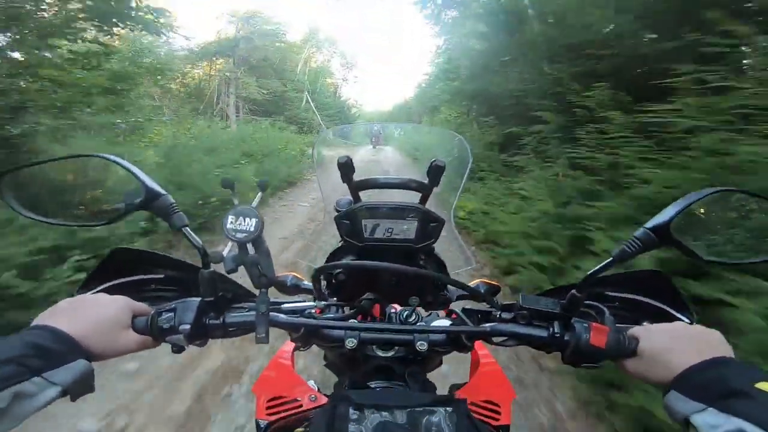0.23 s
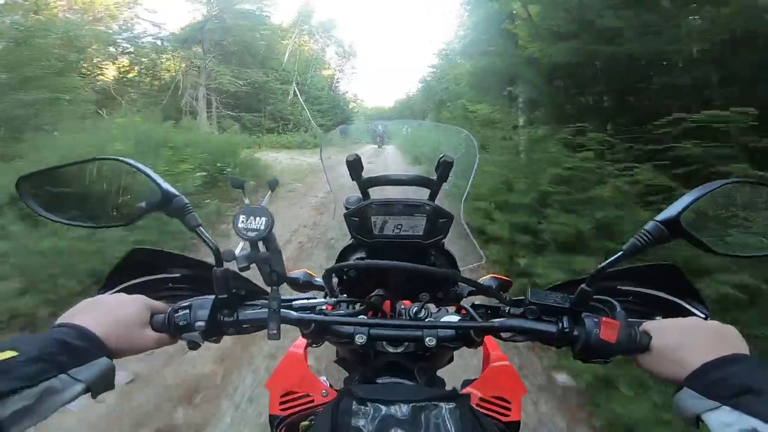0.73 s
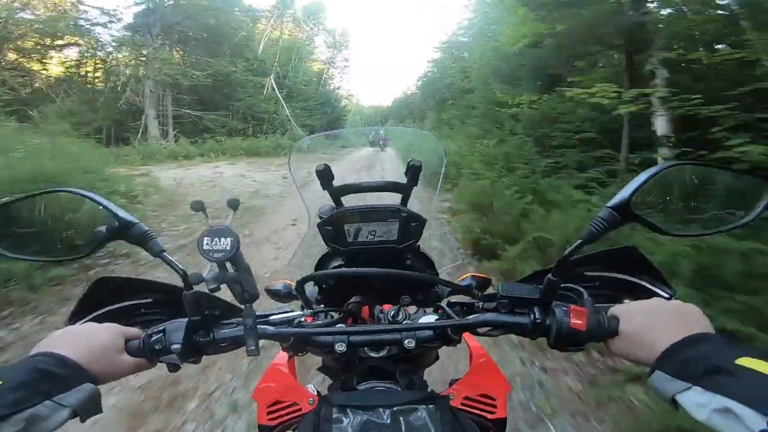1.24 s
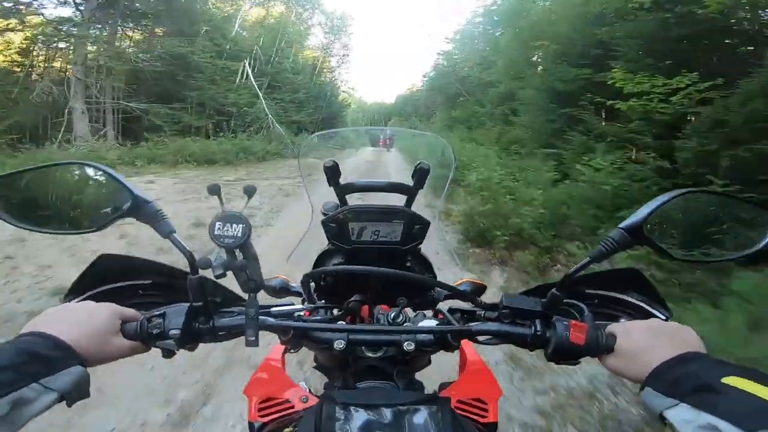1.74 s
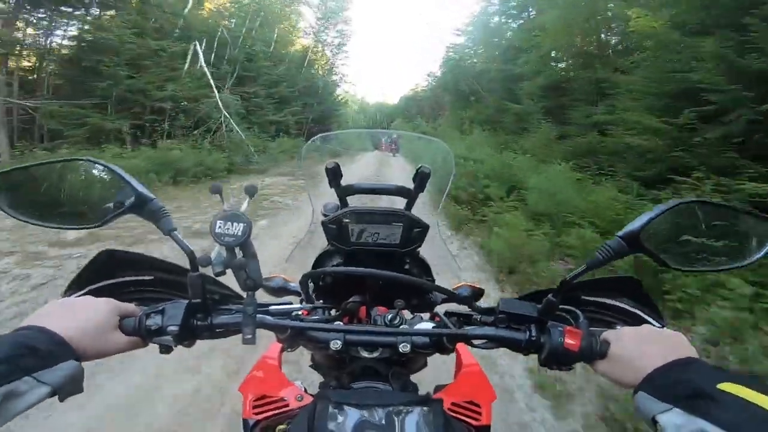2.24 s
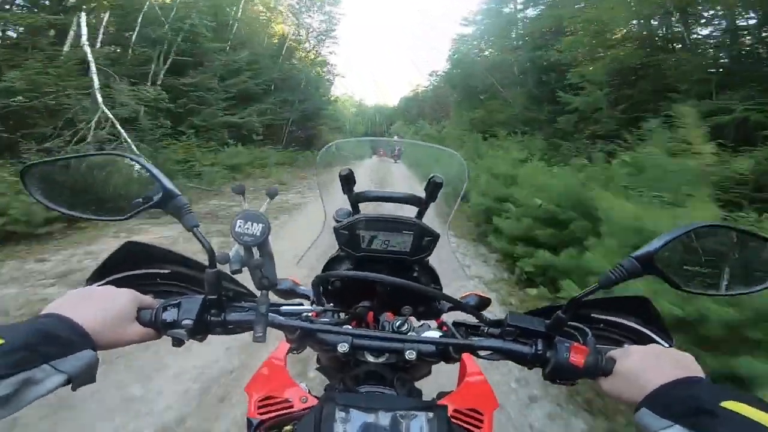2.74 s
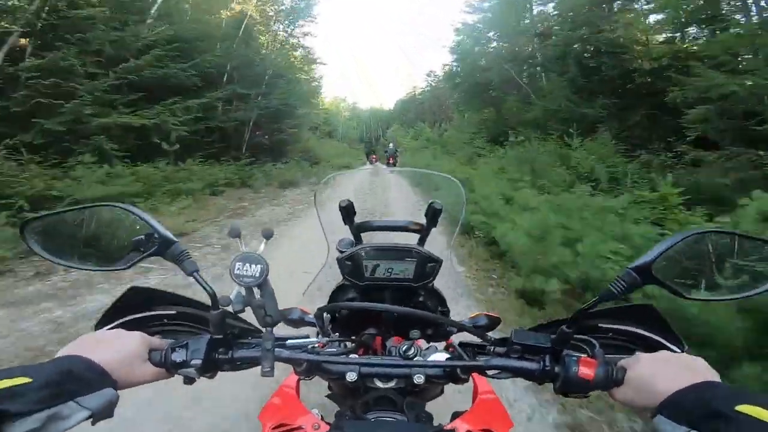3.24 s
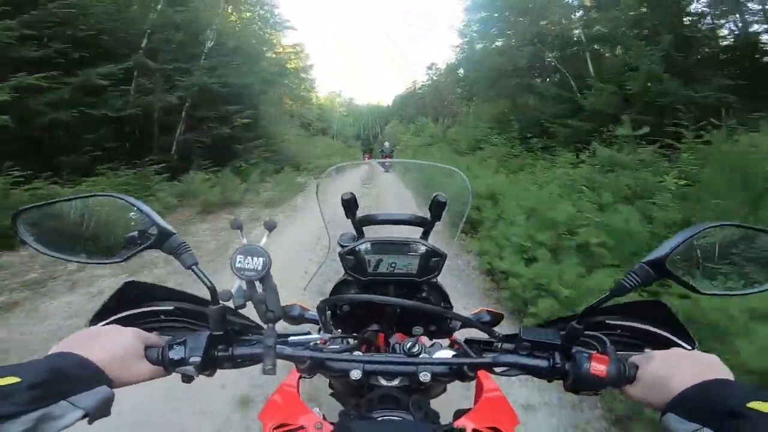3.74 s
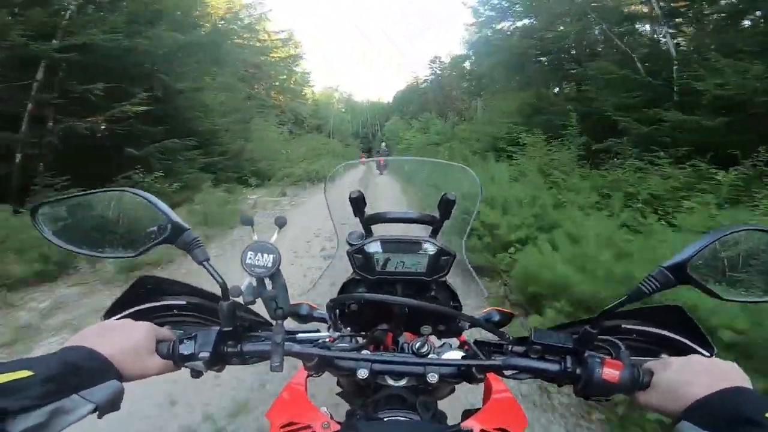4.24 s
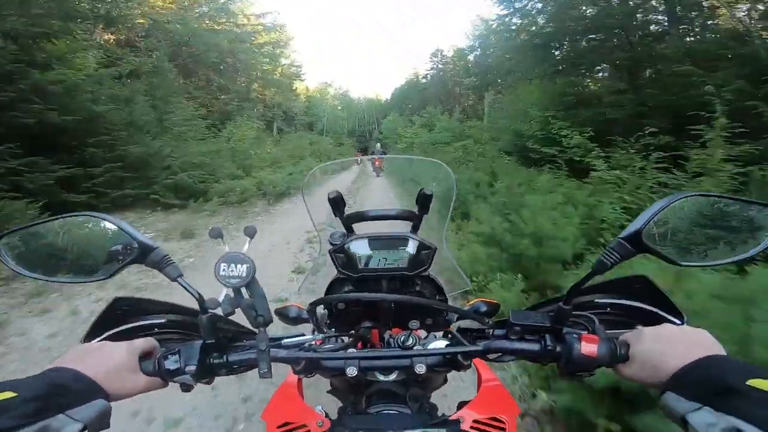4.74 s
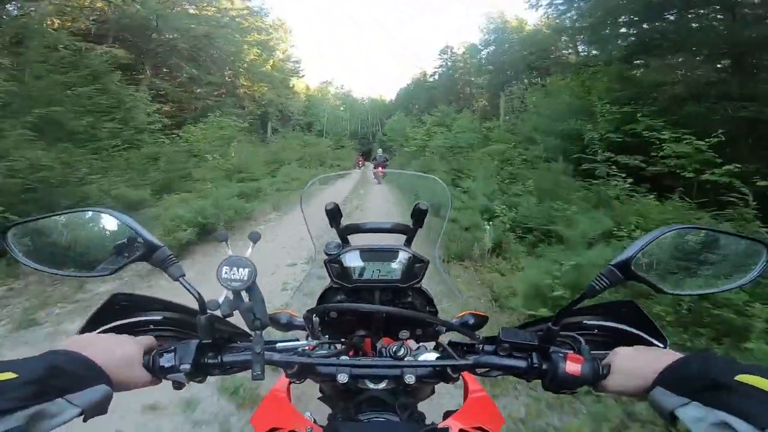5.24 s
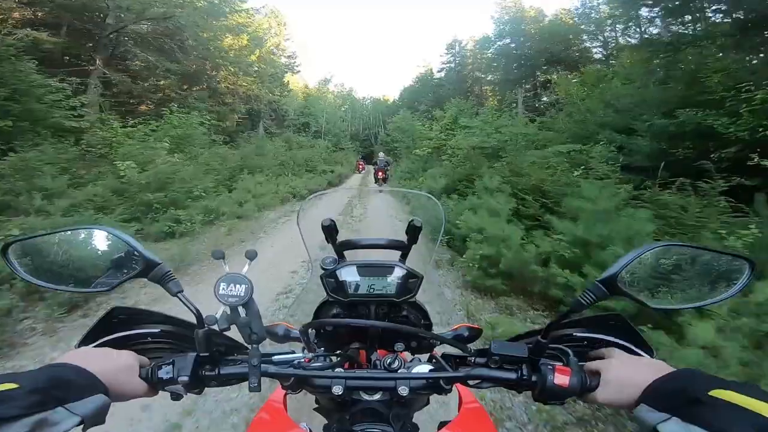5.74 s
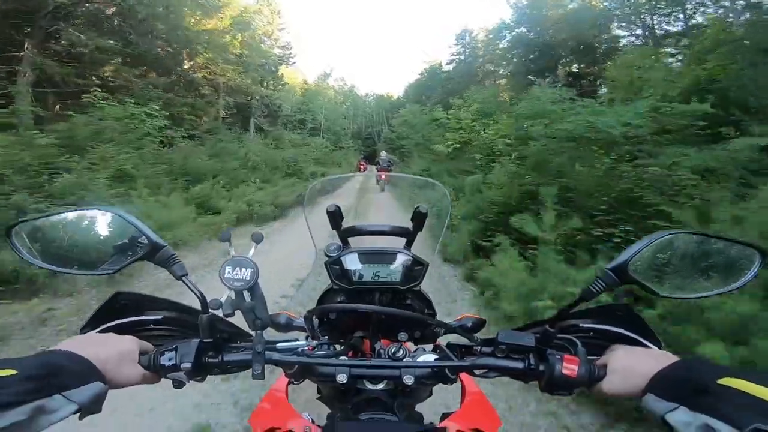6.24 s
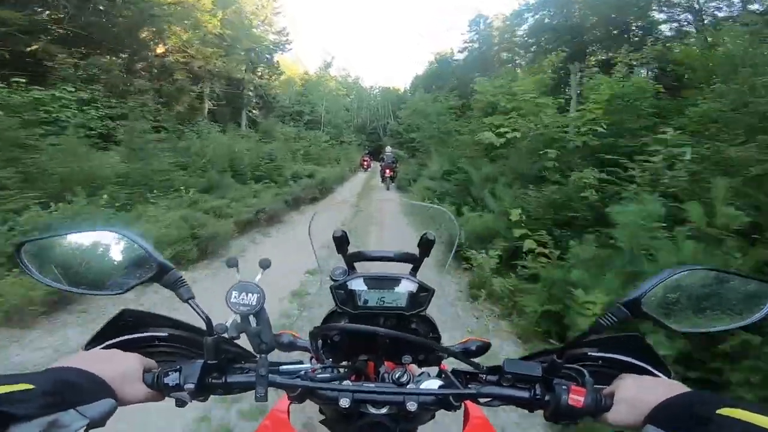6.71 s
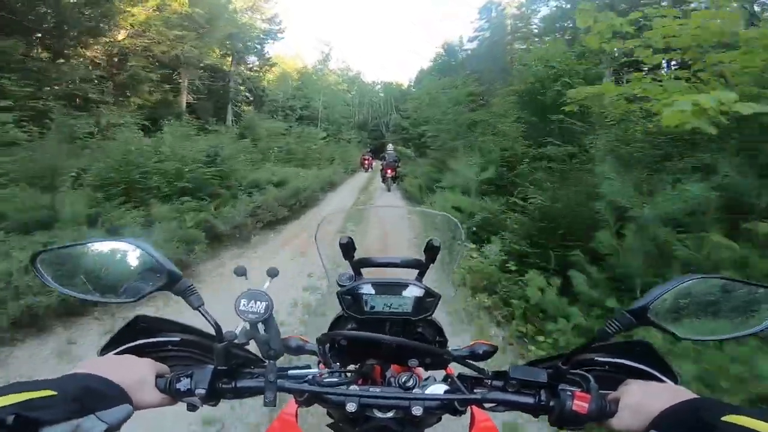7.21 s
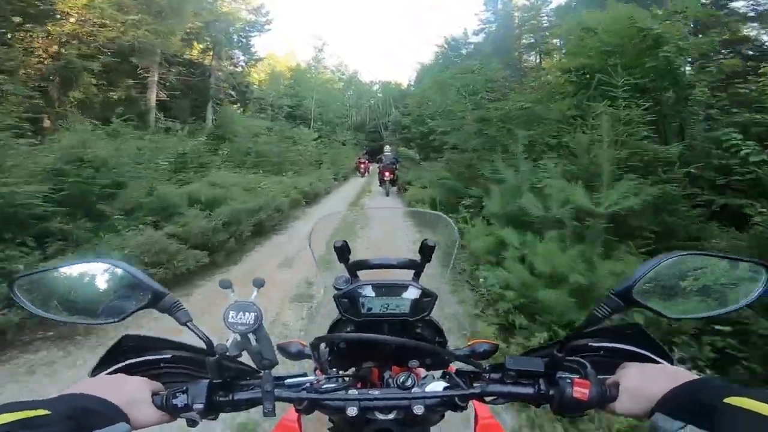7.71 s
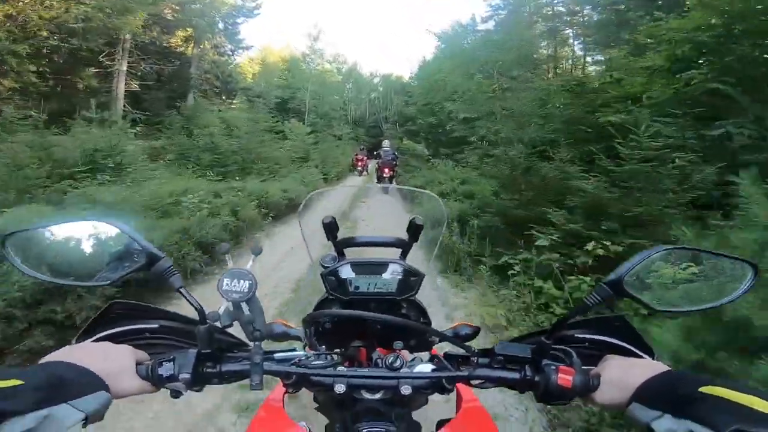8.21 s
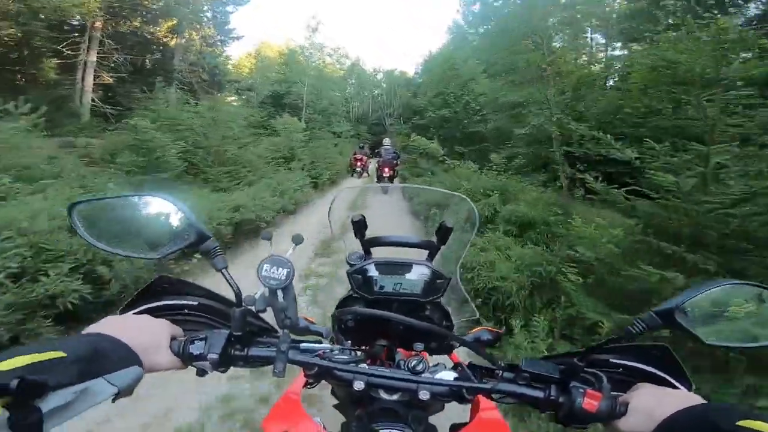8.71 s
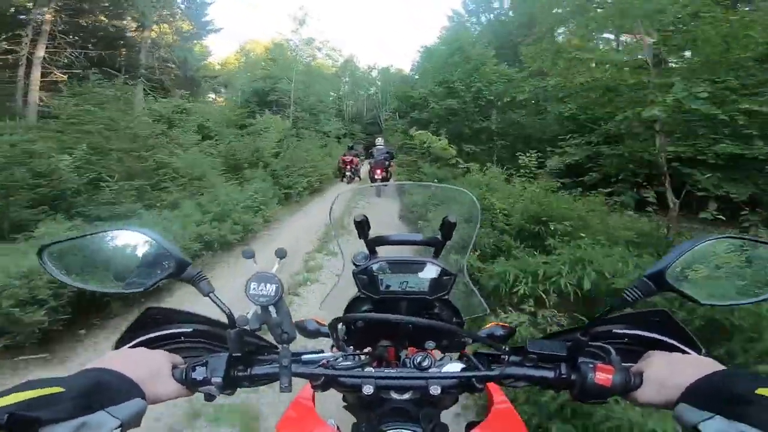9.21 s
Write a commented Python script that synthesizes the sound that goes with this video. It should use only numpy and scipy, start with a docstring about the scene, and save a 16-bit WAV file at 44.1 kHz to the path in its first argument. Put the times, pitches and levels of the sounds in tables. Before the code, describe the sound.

From 0 to about 3 s a single-cylinder motorcycle cruises in gear, its rapid even firings, about 35 a second, merging into a low buzzing drone. Lumpy wind, road rumble and throbbing gravel hiss surround it, with a thin wavering whistle near 2.4 kHz; a stone ticks at 0.1 s. Frame buzz strengthens from 1.6 s. At 3.1-3.4 s a few sharp exhaust pops mark the easing throttle; pitch sags slightly. From 4.3 to 5.3 s the brake scrubs, with faint metallic disc tones. A knock at 5.45 s and a lighter one at 5.7 s accompany the clutch release, as revs fall steeply and drone and tyre hiss fade. From 6.1 s the engine idles unevenly at 12-13 thuds a second, with valve clatter and grit pings. Knocks come at 6.8 and 7.8 s, the latter with flung stones; wind gradually weakens, and the idle thuds swell near 8.4 s, continuing to 9.5 s.

```python
"""Motorcycle slowing on gravel

A single-cylinder motorcycle cruises, shuts the throttle, brakes, pulls the clutch and rolls on at idle.
Pulses once a firing ring the exhaust, sine tones make the drone and the crank shake, a wavering sine whines.
Shaped noise gives wind, tyre hiss, brake scrub, valve clatter and stones; random clicks give grit on the guard.
The microphone rides with the rider and hears nothing above the band limit."""
import sys
import numpy as np
from scipy import signal
from scipy.fft import rfft, irfft, next_fast_len
from scipy.io import wavfile
from scipy.ndimage import uniform_filter1d, map_coordinates

SR = 44100
rng = np.random.default_rng(int(sys.argv[2]) if len(sys.argv) > 2 else 0)


def to_wav(sig):
    """Store sig (one row per channel, or 1-D mono) as 16-bit WAV at the path in sys.argv[1].

    Samples outside -1..1 are clipped; the rate is SR.
    """
    pcm = np.clip(np.atleast_2d(sig), -1, 1) * 32767
    pcm = np.round(pcm).astype(np.int16)
    wavfile.write(sys.argv[1], SR, pcm.T)  # frames by channels


N = 417186  # samples

# Engine speed, first in gear and then at idle. Each row: time in seconds, firings per second.
SPEED_IN_GEAR = [(0.0, 34.9), (0.22, 35.2), (0.77, 34.5), (2, 35.5), (2.3, 36.1), (2.77, 35.8),
                 (3.03, 35.2), (3.33, 32.7), (3.42, 33.7), (4.03, 32.5), (4.24, 31.4), (4.48, 31.2),
                 (4.56, 31.8), (5.2, 30.2), (5.37, 28.4), (5.66, 22.6)]
SPEED_AT_IDLE = [(6.12, 13.65), (6.5, 12.65), (6.9, 12.53), (7.3, 12.65), (7.7, 12.39), (8.1, 13.11),
                 (8.4, 12.61), (8.7, 11.78), (9.0, 12.5), (9.46, 13.37)]
# Pull of the engine. Each row: time in seconds, level in dB relative to full pull.
ENGINE_LOAD = [(0, -6), (1.6, -2.5), (2.1, -5), (2.9, -12.5), (3.3, -10), (3.7, -12), (4.2, -23.5),
               (5.2, -24.5), (5.5, -18), (5.8, -22), (6.12, -8), (6.3, -10.5), (7.9, -13.5), (8.2, -10),
               (8.45, -5), (8.7, -8.5), (9.46, -11.5)]
# Rush of riding, which drives the wind. Each row: time in seconds, level in dB.
RIDING_RUSH = [(0, 1), (2.4, 1.7), (4.45, -2), (5.26, -2.5), (5.86, -4), (9.46, -7)]
# Gusts and bumps. Each row: centre in seconds, length in seconds, lift of the buffeting in dB,
# lift of the rumble in dB.
GUSTS_AND_BUMPS = [(.29, 0.14, 3, 6.5), (.58, 0.2, 3, 3.5), (1.55, 0.21, 0.5, 1.5), (1.966, 0.058, 3, 8),
                   (2.27, 0.074, 0.5, 6), (3.632, 0.1, 9, 6.5), (4.483, 0.083, 0.5, -3),
                   (5.752, 0.36, 5.5, 4.5), (6.85, 0.17, 4, 5.5), (7.395, 0.23, 3, -1.5),
                   (8.37, 0.27, 7, 7.5), (8.85, 0.22, 2.5, 1), (9.25, 0.17, 4.5, 2)]
# Colours of the wind: buffeting, road rumble and airy hiss. Each row: frequency in Hz, relative dB per Hz.
BUFFET_SPECTRUM = [(7.1, -22), (12, -7), (75, 2), (150, -5.5), (204, -9), (250, -5), (320, -43.5),
                   (550, -120)]
RUMBLE_SPECTRUM = [(71, -45.5), (120, -4), (210, -11.5), (286, -1), (562, -16), (630, -26), (708, -17.5),
                   (1000, -23.5), (1300, -43.5), (2200, -120)]
AIR_SPECTRUM = [(4000, -39), (5000, -6), (6000, -1), (6900, 0.5), (7450, 1), (7800, -7.5), (8800, -8.5),
                (9350, -5.5), (9900, -10), (11000, -10), (12000, -17.5), (13400, -28.5)]
# Colour of the tyres on gravel. Each row: frequency in Hz, relative dB per Hz.
TYRE_SPECTRUM = [(350, -32), (600, -13), (843, -13), (936, -12.5), (1130, -6.5), (1280, -2.5),
                 (1490, -10.5), (1660, -11.5), (1830, -2.5), (2070, -8.5), (2260, -15), (2510, -9),
                 (3120, -18), (3840, -21), (4820, -34), (6270, -51), (10600, -120)]
# Resonances of the microphone's housing in the tyre hiss. Each row: frequency in Hz, width in Hz, lift in dB.
HOUSING_LIFTS = [(1285, 45, 4), (1602, 89, 6.5), (1777, 62, 3.5), (1910, 47, 2), (1994, 210, 3.5),
                 (2530, 28, -2.5), (3740, 63, -4), (4440, 26, 1)]
# Tyre hiss. Each row: time in seconds, level in dB.
TYRE_LEVEL = [(0, -31), (1.6, -32), (3.5, -33.5), (3.8, -36), (4.2, -34.5), (4.45, -38), (5.4, -36),
              (5.7, -40.5), (6.2, -59), (6.5, -67)]
# A thin whistle. Each row: time in seconds, frequency in Hz, level in dB.
WHINE_TRACK = [(0, 2408, -42.5), (.45, 2402, -43), (1.2, 2410, -43), (1.5, 2428, -41), (1.7, 2440, -38),
               (1.95, 2448, -43), (2.08, 2470, -44), (2.16, 2470, -64), (2.9, 2450, -47), (3.2, 2400, -57),
               (3.5, 2330, -100)]
# Colour of the brake scrub. Each row: frequency in Hz, relative dB per Hz.
SCRUB_SPECTRUM = [(530, -57.5), (900, -21), (1090, -1), (1300, -6.5), (1430, -23), (1570, -3), (2000, -4),
                  (2120, -0.5), (2360, -23), (2850, -9), (3720, -29.5), (4370, -24), (4820, -31),
                  (6270, -48), (10600, -120)]
# Modes of the brake disc. Each row: frequency in Hz, width in Hz, start in seconds, end in seconds, level in dB.
DISC_MODES = [(4340, 200, 4.5, 5.25, -60), (4050, 130, 5.12, 5.4, -58), (2070, 16, 4.85, 5.26, -43),
              (1905, 20, 4.65, 5.2, -45), (1780, 24, 4.52, 5.18, -44), (1590, 20, 4.55, 5.18, -46),
              (1095, 22, 4.6, 5.3, -46), (1250, 40, 4.95, 5.38, -47), (1900, 60, 5.25, 5.64, -45)]
# Loose gravel at low speed. Each row: time in seconds, level in dB.
CRUNCH_LEVEL = [(5.45, -70), (5.7, -47.5), (6.05, -43.5), (6.2, -43.5), (6.5, -43), (6.9, -41.5),
                (7.03, -44), (7.085, -37), (7.15, -47), (7.3, -48), (8.2, -45), (8.4, -57), (9.46, -54)]
# Resonances of the sump guard. Each row: frequency in Hz, width in Hz, level in dB.
GUARD_MODES = [(1120, 195, -1.5), (1304, 150, 1.5), (1550, 220, -3.5), (2070, 200, -5.5)]
# Flung stones. Each row: start in seconds, strength of the tick in dB, body over the tick in dB.
FLUNG_STONES = [(0.121, -45, 20), (7.762, -44.5, 12), (7.784, -41, 20.5)]
# Knocks in the frame. Each row: start in seconds, strength in dB.
FRAME_KNOCKS = [(5.451, -15), (5.702, -24), (6.833, -21), (7.778, -28)]
# Resonances of the knocked frame. Each row: frequency in Hz, width in Hz, level in dB.
FRAME_MODES = [(130, 70, 2), (330, 200, -2), (740, 340, -10)]
# Colour of the cylinder head. Each row: frequency in Hz, relative dB per Hz.
HEAD_SPECTRUM = [(260, -37), (450, -9.5), (522, -16.5), (582, -12.5), (717, -7.5), (938, -8.5), (1250, -1),
                 (1370, 0.5), (1480, -7.5), (1770, -10.5), (2120, -7), (2330, -15), (2550, -11.5),
                 (2850, -10), (3300, -15), (3760, -25.5), (4450, -27), (4820, -37), (6270, -52),
                 (10600, -120)]
# Resonances of the engine covers. Each row: frequency in Hz, width in Hz, lift in dB.
COVER_LIFTS = [(1230, 550, -1), (2800, 45, 8), (4100, 71, 4)]
# Ring of the cover. Each row: time in seconds, level over the head in dB.
COVER_LEVEL = [(5.5, -1), (5.9, -3), (6.05, -14), (6.3, -5), (6.45, -0.5), (7, -1), (7.2, -4), (7.6, -1),
               (8.3, 0.5), (8.45, -4), (8.65, -2), (9.46, -0.5)]
# Low drone. Each row: multiple of the firing rate, relative level in dB, change when coasting in dB.
LOW_TONES = [(1, -1, -4), (2, 1.5, 1), (3, -4, -9), (5, -3, 3)]
# High drone. Each row: multiple of the firing rate, relative level in dB.
HIGH_TONES = [(5, -8), (6, -9), (7, -7), (8, -2.5), (9, -6), (10, -2), (11, -10), (12, -3), (13, -7),
              (14, -10), (15, -13), (16, -10), (17, -17), (19, -22), (20, -16), (21, -21), (24, -21)]
# Chain and gear teeth. Each row: multiple of the firing rate, relative level in dB.
TOOTH_TONES = [(34, -1), (36, 0), (38, -3), (46, -3), (50, -3), (52, 0), (56, -1), (62, -3), (68, 0),
               (73, -3)]
# Resonances of the crankcase. Each row: frequency in Hz, width in Hz, level in dB.
CRANKCASE_MODES = [(1280, 220, -2), (1608, 190, 0), (1837, 280, 2), (2080, 137, -1), (2580, 53, -7.5)]
# Silencer chambers. Each row: frequency in Hz, width in Hz, level in dB.
SILENCER_MODES = [(33.6, 21, -6), (57.7, 18, 2), (107, 46, 7.5)]
# Tail pipe. Each row: frequency in Hz, width in Hz, level in dB.
TAIL_PIPE_MODES = [(174, 36, -17.5), (280.5, 57, 4.5), (340, 134, -4), (409, 90, -5)]
# Exhaust thud. Each row: time in seconds, level in dB.
THUD_LEVEL = [(0, -42), (.8, -38.5), (1.6, -37), (2.3, -39), (3, -47), (3.4, -38), (3.8, -34), (4.3, -44),
              (5, -39), (5.3, -38), (5.45, -31), (5.6, -36), (5.75, -30), (5.9, -44), (6.13, -36),
              (6.22, -30), (7.6, -32), (8.2, -29), (8.45, -26.5), (8.62, -29.5), (9.46, -31.5)]

# Moments of the ride, in seconds.
A_FIRING = 6.2  # one firing that sets the timing of all
OVERRUN = (1.6, 2.73)  # the wheel starts to push the engine, pushes fully
COASTING = (3.5, 4.6)  # the throttle starts to close, is shut
BRAKING = (4.25, 4.62, 5.19, 5.3)  # the brake touches, bites, eases, lets go
CLUTCH = (5.5, 5.85)  # the lever starts to move, the drive is free
CLATTER_IN = (4.6, 5.87)  # the clatter emerges as the revs fall
MESH_FADES = (5.15, 5.6)  # the teeth unload as the brake lets go
WHINE_SETTLES = (0.98, 1.5)  # the whistle turns from fuzzy to clearer

# Levels before gusts and rush; "follows" is in dB per dB of the rush.
BUFFET_DB, BUFFET_FOLLOWS = -32.5, 0.38
RUMBLE_DB, RUMBLE_FOLLOWS = -35.5, 1.41
AIR_DB = -68
BRAKE_DB, BRAKE_FADE_DB = -37.5, 15  # at full pressure; loss as the pressure goes to nothing
GRITS_PER_S, GRIT_SPREAD_DB = 1200, 2.2  # base rate, which each firing modulates; mean excess strength
KNOCK_PUSH_DB, KNOCK_PUFF_DB = 25, 4  # the blow and its puff over the knock's strength
CLATTER_DB, CLATTER_FOLLOWS = -42.5, -0.39  # head at idle; dB per dB of load over idle
IDLE_LOAD_DB = -12
LOW_DB, HIGH_DB, MESH_DB = -32, -30.5, -36  # drone and teeth in gear at full pull
HIGH_FOLLOWS, MESH_FOLLOWS = .5, .5  # dB per dB of eased load
MESH_BRAKING_DB, FREE_DB = 3, -30  # extra under the brake; loss when free
SHAKE_DB, OVERRUN_SHAKE_DB, FREE_SHAKE_DB = -34.5, 6, -55  # cruising; extra on the overrun; loss when free
STUMBLE = (5.07, .045, -14)  # the shake drops out briefly: centre s, length s, change dB
BARK_DB, BARK_IN_GEAR_DB = -29.5, -4  # at full pull; softer while the wheel holds the engine
POPS, POP_DB, A_POP = (3.1, 3.2, 3.4, 3.42), -34.5, 3.2985  # s: start, full, ease, end; dB; one pop's time s
TOP_HZ = 13480  # band limit


def amp(db):
    """Decibels to gain."""
    return 10 ** (np.asarray(db) / 20)


def unit(x):
    """Scaled to rms 1."""
    return x / np.sqrt(np.mean(x ** 2) + 1e-20)


def curves(rows):
    """One value per sample for each column after the time."""
    seconds, *columns = np.transpose(rows)
    return [np.interp(np.arange(N) / SR, seconds, column) for column in columns]


def ramp(start, end):
    """Rises from 0 to 1 between two times in seconds."""
    return np.clip((np.arange(N) / SR - start) / (end - start), 0, 1)


def wobble(rate, step=1):
    """A smooth random curve, rate knots a second, read every step samples."""
    coarse = np.arange(0, N + 32, 32)
    knots = rng.standard_normal(int(N * rate / SR) + 4)
    curve = map_coordinates(knots, [coarse * rate / SR])
    return np.interp(np.arange(0, N, step), coarse, curve)


def filtered(x, response):
    """x times a complex response of frequency, padded so that tails do not wrap."""
    size = next_fast_len(N + SR // 2)
    hz = np.fft.rfftfreq(size, 1 / SR)
    return irfft(rfft(x, size) * response(hz), size)[:N]


def muffled(x, top_hz, order):
    """A cascade of one-pole low-passes."""
    return filtered(x, lambda hz: 1 / (1 + 1j * hz / top_hz) ** order)


def ringing(x, modes):
    """x through parallel causal resonances of alternating sign."""
    def response(hz):
        total = 0
        for k, (centre, width, db) in enumerate(modes):
            resonance = 1j * hz * width / (centre ** 2 - hz ** 2 + 1j * hz * width)
            total = total + (-1) ** k * amp(db) * resonance
        return total
    return filtered(x, response)


def hiss(spectrum, lifts=(), patchy_db=0, gate=1):
    """Gated noise of rms 1 with random patches, coloured by a spectrum and resonant lifts."""
    cells = signal.stft(rng.standard_normal(N), nperseg=512)[2]
    patches = uniform_filter1d(rng.standard_normal(cells.shape), 4, 0)  # smooth over frequency
    patches = uniform_filter1d(patches, 12, 1)  # and over time
    noise = gate * signal.istft(cells * amp(patchy_db * unit(patches)), nperseg=512)[1][:N]
    points_hz, points_db = np.transpose(spectrum)

    def colour(hz):
        base_db = np.interp(np.log(hz + 1), np.log(points_hz + 1), points_db)
        lift_db = sum(db / (1 + (2 * (hz - centre) / width) ** 2) for centre, width, db in lifts)
        return amp(base_db + lift_db)
    return unit(filtered(noise, colour))


def orders(table, cycle, sway_db, drift, rate):
    """Tones on multiples of the firing rate, each swaying in level and phase; rms 1."""
    step = 5  # the tones are low enough for a coarse grid
    tones = 0
    for multiple, db in table:
        level_db = np.broadcast_to(db, N)[::step] + sway_db * wobble(rate, step)
        phase = 2 * np.pi * (multiple * cycle[::step] + rng.random()) + drift * wobble(rate, step)
        tones = tones + amp(level_db) * np.sin(phase)
    return unit(signal.resample_poly(tones, step, 1)[:N])


def crank():
    """Firings per second, and their running count, whole at each firing."""
    rate, = curves(SPEED_IN_GEAR + SPEED_AT_IDLE)
    cycle = np.cumsum(rate) / SR
    return rate, cycle - cycle[round(A_FIRING * SR)]


def beat(cycle, at, sharp):
    """A bump of height 1 once a cycle."""
    return np.exp(sharp * (np.cos(2 * np.pi * (cycle - at)) - 1))


def braking():
    """Pressure on the brake, 0 to 1."""
    touch, bite, ease, off = BRAKING
    return ramp(touch, bite) - ramp(ease, off)


def jolts():
    """Lift in dB of buffeting and rumble: one smooth swell for each gust or bump."""
    t = np.arange(N) / SR
    return sum(np.outer(lifts, np.exp(-((t - s) / length) ** 2)) for s, length, *lifts in GUSTS_AND_BUMPS)


def wind(cycle):
    """Lumpy buffeting on the microphone, road rumble through the frame and a thin airy hiss."""
    rush_db = curves(RIDING_RUSH)[0]
    gust_db, bump_db = jolts()
    buffet_db = BUFFET_DB + BUFFET_FOLLOWS * rush_db + gust_db
    rumble_db = RUMBLE_DB + RUMBLE_FOLLOWS * rush_db + bump_db
    # each firing jolts the frame, so all three pulse with the engine
    buffet_gate = (1 + 0.47 * beat(cycle, 0.32, 1.7)) * amp(1.2 * wobble(12))
    rumble_gate = (1 + 0.62 * beat(cycle, 0.12, 4.6)) * amp(1.9 * wobble(30))
    air_gate = (1 + 0.33 * beat(cycle, .1, 7)) * amp(0.92 * wobble(60) + .8 * wobble(5.9))
    buffet = hiss(BUFFET_SPECTRUM, patchy_db=-1.0, gate=buffet_gate)
    rumble = hiss(RUMBLE_SPECTRUM, patchy_db=0.5, gate=rumble_gate)
    air = hiss(AIR_SPECTRUM, patchy_db=0.5, gate=air_gate)
    return amp(buffet_db) * buffet + amp(rumble_db) * rumble + amp(AIR_DB + rush_db) * air


def tyres(cycle):
    """Gravel hiss in the housing's resonances, throbbing with the firing."""
    throb = 1 + 0.27 * beat(cycle, .2, 2.7) + 0.11 * beat(2 * cycle, 0.092, 1.5)
    noise = hiss(TYRE_SPECTRUM, HOUSING_LIFTS, patchy_db=1.2, gate=throb * amp(.4 * wobble(12)))
    return amp(curves(TYRE_LEVEL)[0]) * noise


def whine():
    """A thin gear whistle: one sine whose phase and level waver."""
    hz, level_db = curves(WHINE_TRACK)
    fuzz = (1.4 - .5 * ramp(*WHINE_SETTLES)) * wobble(70)  # radians
    tone = np.sin(2 * np.pi * np.cumsum(hz) / SR + fuzz) * amp(1.5 * wobble(15))
    return amp(level_db) * unit(tone)


def brake():
    """Pads scrub as patchy noise that swells with the pressure."""
    pressure = braking()
    level_db = BRAKE_DB - BRAKE_FADE_DB * (1 - pressure)
    return (pressure > 0) * amp(level_db) * hiss(SCRUB_SPECTRUM, patchy_db=2.2)


def disc():
    """Narrow noise in the modes of the brake disc, fading in and out."""
    total = 0
    for hz, width, start, end, db in DISC_MODES:
        whir = ringing(rng.standard_normal(N), [(hz, width, 0)])
        whir = unit(ringing(whir, [(hz, 2 * width, 0)]))
        fade = ramp(start, start + .12) - ramp(end - .06, end)
        total = total + amp(db) * fade * whir
    return total


def crunch(cycle):
    """Grit pings on the sump guard, thicker when a firing jolts the bike."""
    density = .6 + beat(cycle, .1, 3) + .6 * beat(cycle, .85, 4)
    struck = rng.random(N) < GRITS_PER_S / SR * density
    strength = amp(GRIT_SPREAD_DB * rng.exponential(size=N))
    grit = struck * strength * rng.choice([-1, 1], N)
    return amp(curves(CRUNCH_LEVEL)[0]) * unit(muffled(ringing(grit, GUARD_MODES), 3500, order=4))


def stones():
    """Flung stones tick on the guard: short noise bursts ring a bright tick and a duller body."""
    tick, body = np.zeros((2, N + SR))
    t = np.arange(SR // 10) / SR
    rise = 1 - np.exp(-t / .004)  # a glancing blow builds up
    for s, db, body_db in FLUNG_STONES:
        first = round(s * SR)
        # 60 dB down in 50 ms and 80 ms, apart from the rise
        tick[first:][:len(t)] += rise * amp(db - 60 * t / .05) * rng.standard_normal(len(t))
        body[first:][:len(t)] += rise * amp(db + body_db - 60 * t / .08) * rng.standard_normal(len(t))
    bright = ringing(tick[:N], [(4200, 650, 7), (7000, 1000, 3.5), (10400, 2000, -12)])
    dull = muffled(ringing(body[:N], [(1250, 530, 12), (2200, 1300, 9)]), 4800, order=5)
    return bright + dull


def knocks():
    """A single push rings the frame under a short dull puff of noise."""
    puff, blows = np.zeros((2, N + SR))
    t = np.arange(SR // 10) / SR
    for s, db in FRAME_KNOCKS:
        first = round(s * SR)
        puff[first:][:len(t)] += amp(db + KNOCK_PUFF_DB - 60 * t / 0.02) * rng.standard_normal(len(t))
        blows[first] = -amp(db + KNOCK_PUSH_DB)
    dull = muffled(ringing(puff[:N], [(550, 1000, 9.3)]), 1200, order=5)
    return dull + muffled(ringing(blows[:N], FRAME_MODES), 1700, order=3)


def valves(cycle):
    """The head hisses in step with the firing; a cover rings twice a cycle."""
    gate = 1 + .5 * beat(cycle, .12, 8) + .45 * beat(cycle, .84, 5)
    head = hiss(HEAD_SPECTRUM, COVER_LIFTS, patchy_db=1.2, gate=gate * amp(.9 * wobble(40)))
    tappet_gate = 0.5 + beat(cycle, 0.915, 5.2) + 0.64 * beat(cycle, 0.37, 2.9)
    tappet = tappet_gate * rng.standard_normal(N)
    cover = ringing(ringing(tappet, [(1765, 103, 0)]), [(1730, 1600, 0)])
    cover = unit(muffled(cover, 3000, order=4))
    over_idle_db = np.maximum(curves(ENGINE_LOAD)[0] - IDLE_LOAD_DB, 0)
    level = ramp(*CLATTER_IN) * amp(CLATTER_DB + CLATTER_FOLLOWS * over_idle_db)
    return level * (head + amp(curves(COVER_LEVEL)[0]) * cover)


def drone(cycle):
    """In gear the firings run so evenly that they merge into clean tones; teeth sing in the crankcase."""
    eased_db = uniform_filter1d(curves(ENGINE_LOAD)[0], SR // 2)  # the driveline answers slowly
    free_db = FREE_DB * ramp(*CLUTCH) ** 2
    low_db = LOW_DB + free_db
    high_db = HIGH_DB + HIGH_FOLLOWS * eased_db + free_db
    mesh_db = MESH_DB + MESH_FOLLOWS * eased_db + MESH_BRAKING_DB * braking() + FREE_DB * ramp(*MESH_FADES)
    low_table = [(multiple, db + change * ramp(*COASTING)) for multiple, db, change in LOW_TONES]
    low = orders(low_table, cycle, sway_db=2, drift=.4, rate=3)
    high = orders(HIGH_TONES, cycle, sway_db=3.2, drift=.55, rate=5)
    teeth = orders(TOOTH_TONES, cycle, sway_db=3, drift=1.7, rate=14)
    teeth = unit(ringing(teeth, CRANKCASE_MODES))
    return amp(low_db) * low + amp(high_db) * high + amp(mesh_db) * teeth


def crank_shake(cycle):
    """The crank shakes the frame: a sine of four swings a firing, uneven in phase and level."""
    level_db = SHAKE_DB + OVERRUN_SHAKE_DB * ramp(*OVERRUN) + FREE_SHAKE_DB * ramp(*CLUTCH)
    centre, length, dip_db = STUMBLE
    level_db = level_db + dip_db * np.exp(-((np.arange(N) / SR - centre) / length) ** 2)
    shake = np.sqrt(2) * np.sin(2 * np.pi * 4 * cycle + 0.6 * wobble(9))
    return amp(level_db + 1.6 * wobble(14)) * shake


def exhaust_pops(cycle):
    """Sharp pops in the pipe, one a firing, for a moment as the throttle blips."""
    sparks = np.diff(np.floor(cycle - cycle[round(A_POP * SR)]), prepend=0).clip(0, 1)
    pops = unit(ringing(muffled(sparks, 700, order=3), [(260, 520, 0)]))
    popping = ramp(*POPS[:2]) - ramp(*POPS[2:])
    return -popping * amp(POP_DB) * pops


def exhaust(rate, cycle):
    """Each firing rings the silencer and the tail pipe, with a puff of turbulent gas."""
    thud_db = curves(THUD_LEVEL)[0]
    bark_db = BARK_DB + BARK_IN_GEAR_DB * (1 - ramp(*CLUTCH)) + curves(ENGINE_LOAD)[0]
    fired = np.flatnonzero(np.diff(np.floor(cycle)))
    timing_luck, thud_luck, bark_luck = rng.standard_normal((len(fired), 3)).T
    uneven = (12.5 / rate[fired]) ** 2  # burning is steady at speed and lumpy at idle
    delay = (.0006 * SR * uneven * timing_luck).astype(int)  # samples, early or late
    moments = np.clip(fired + delay, 0, N - 1)
    size = 1 / np.sqrt(rate[fired])  # equal power at any speed
    thuds = np.bincount(moments, size * amp((.6 + .4 * uneven) * thud_luck), N)
    barks = np.bincount(moments, size * amp((1 + uneven) * bark_luck), N)
    thud = unit(ringing(muffled(thuds, 170, order=4), SILENCER_MODES))
    barks = np.roll(barks, round(0.00301 * SR))  # the bark trails by 3 ms
    bark = ringing(muffled(barks, 620, order=5), TAIL_PIPE_MODES)
    bark = unit(ringing(bark, [(290, 1100, 0)]))
    turbulence = beat(cycle, .08, 10) * rng.standard_normal(N)
    puff = unit(ringing(muffled(turbulence, 200, order=4), [(90, 90, 0)]))
    gas = amp(-9 + 1.3 * wobble(12))  # differs from stroke to stroke
    return amp(thud_db) * (thud + gas * puff) + amp(bark_db) * bark


def scene():
    """All sources at the one microphone."""
    rate, cycle = crank()
    surroundings = wind(cycle) + tyres(cycle) + crunch(cycle) + stones() + knocks()
    machinery = whine() + brake() + disc() + valves(cycle) + drone(cycle) + crank_shake(cycle)
    return (surroundings + machinery + exhaust_pops(cycle) + exhaust(rate, cycle))[None]


def record(dry):
    """The microphone keeps nothing above its band limit."""
    return filtered(dry[0], lambda hz: hz < TOP_HZ)[None]


dry = scene()
out = record(dry)
to_wav(out)
```